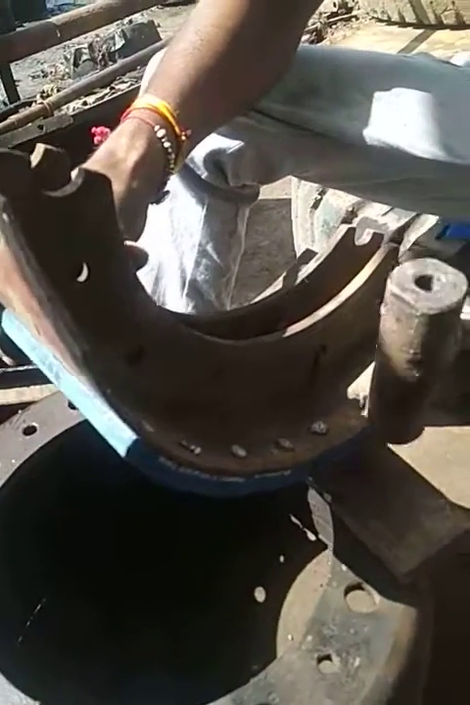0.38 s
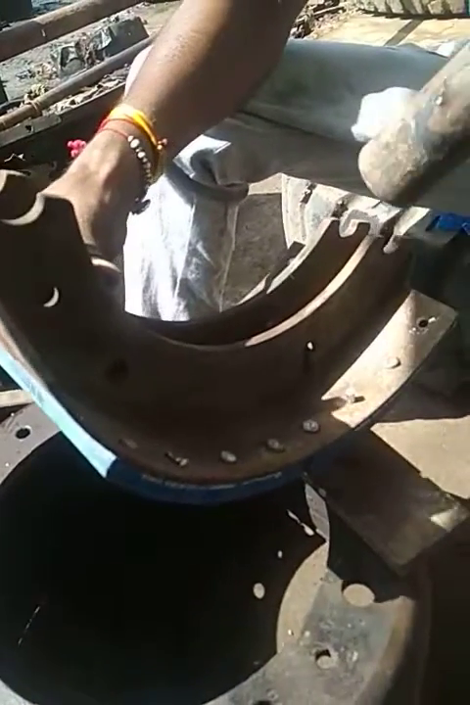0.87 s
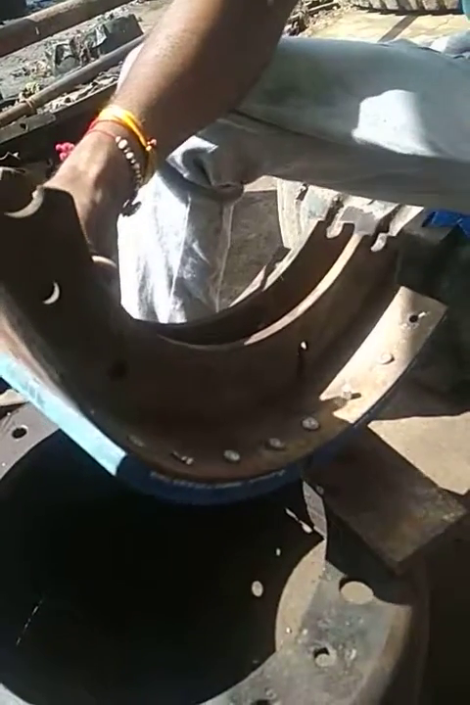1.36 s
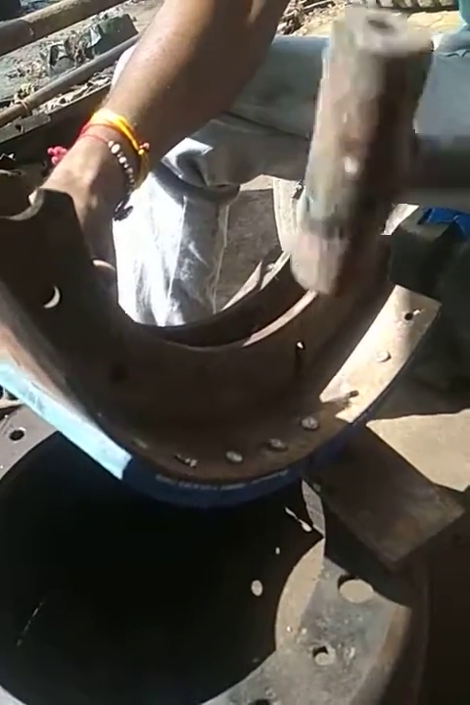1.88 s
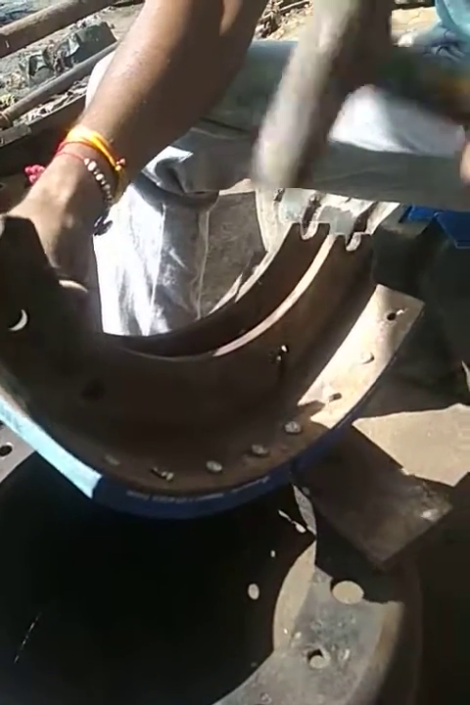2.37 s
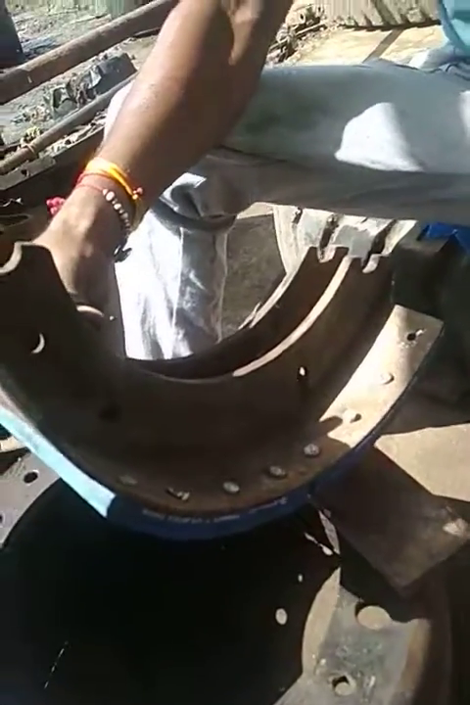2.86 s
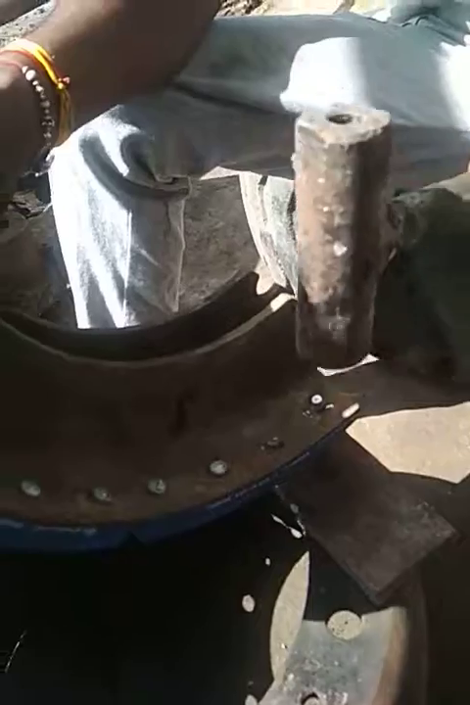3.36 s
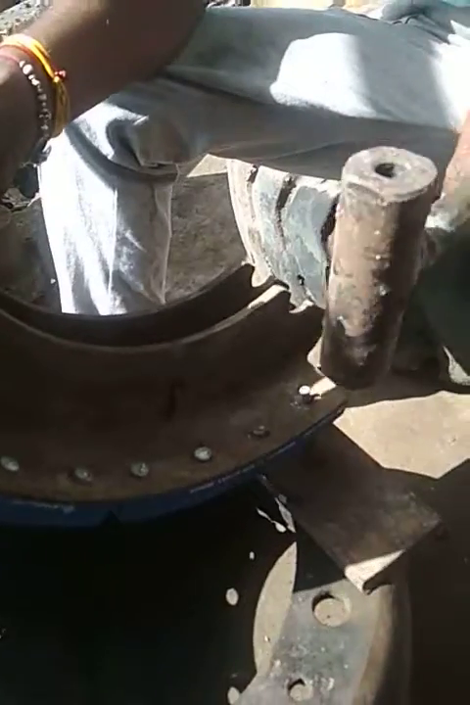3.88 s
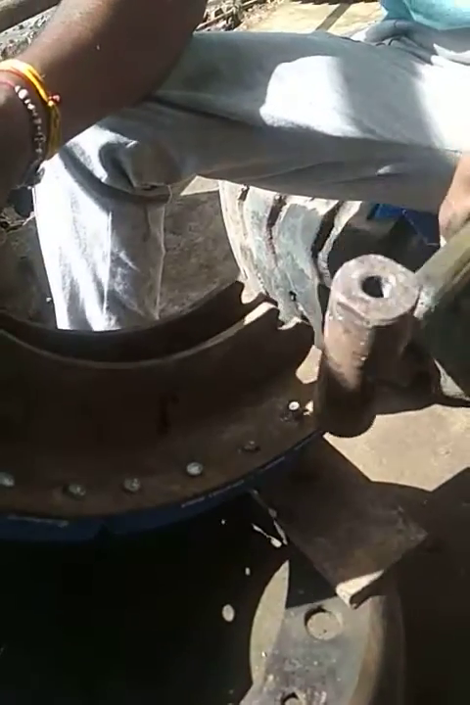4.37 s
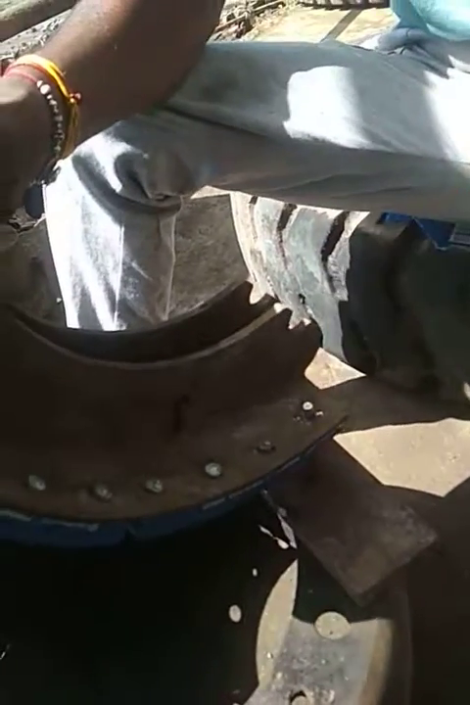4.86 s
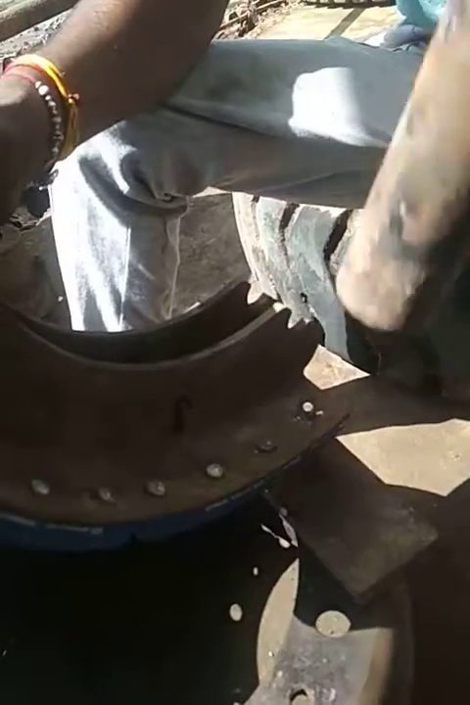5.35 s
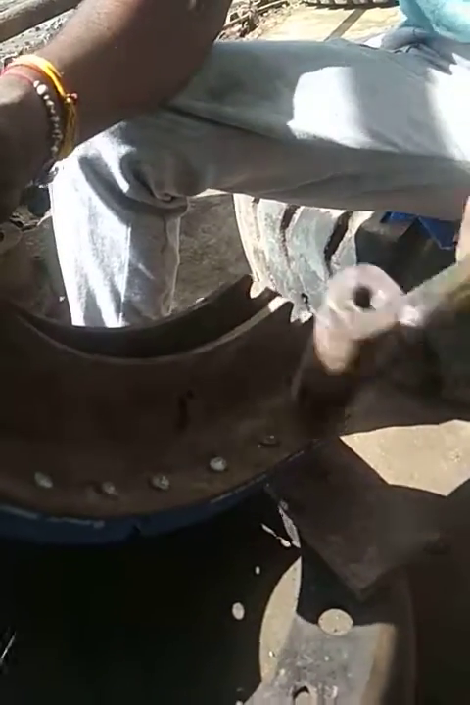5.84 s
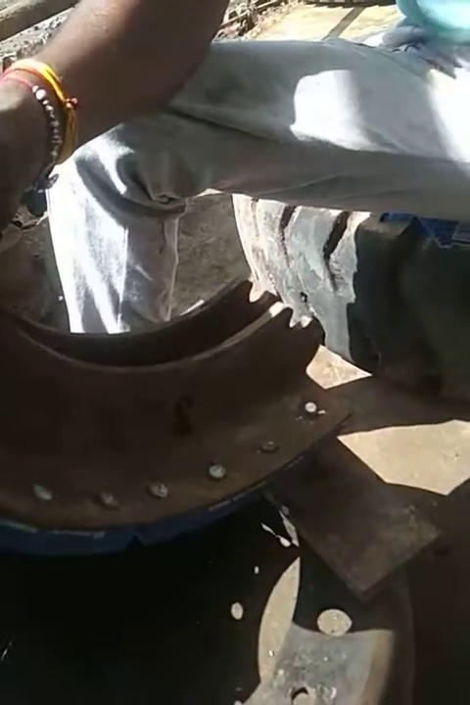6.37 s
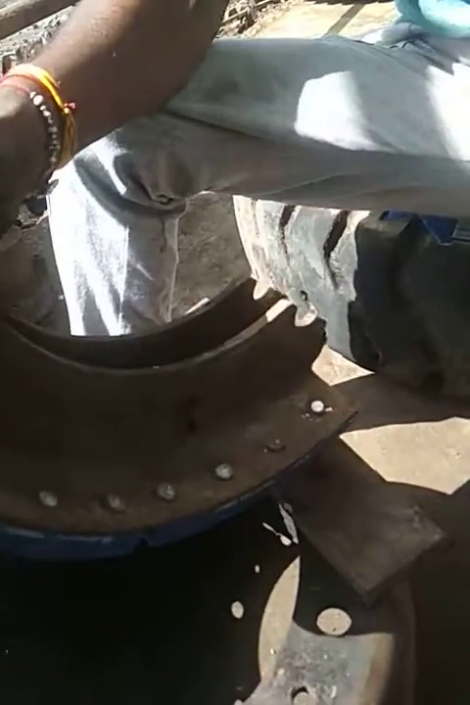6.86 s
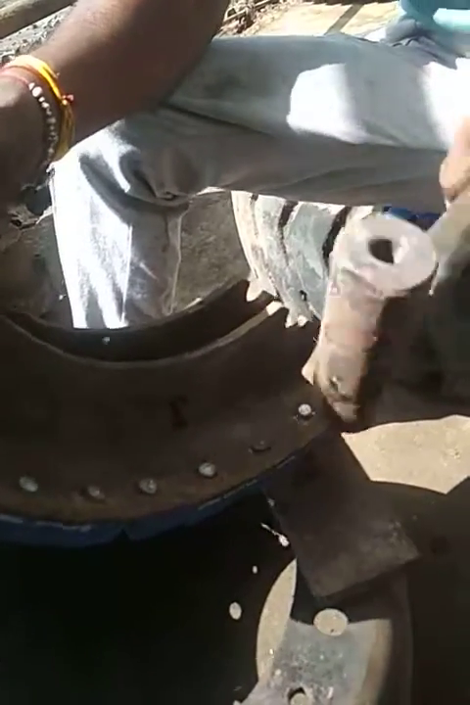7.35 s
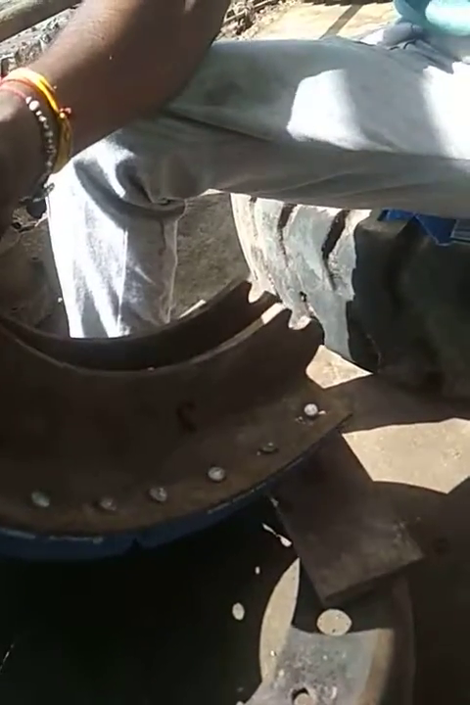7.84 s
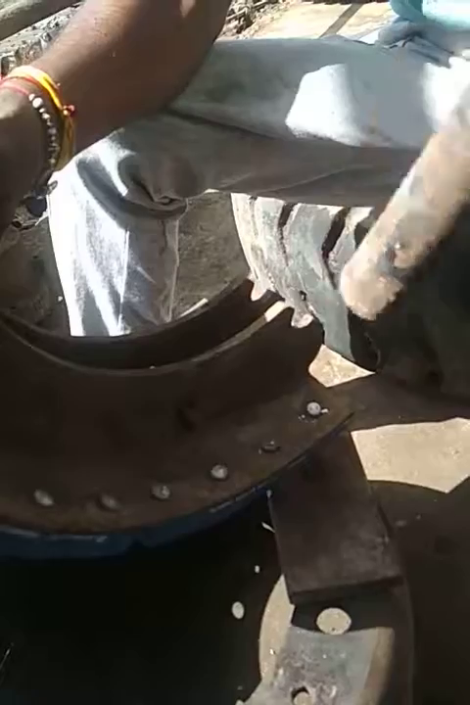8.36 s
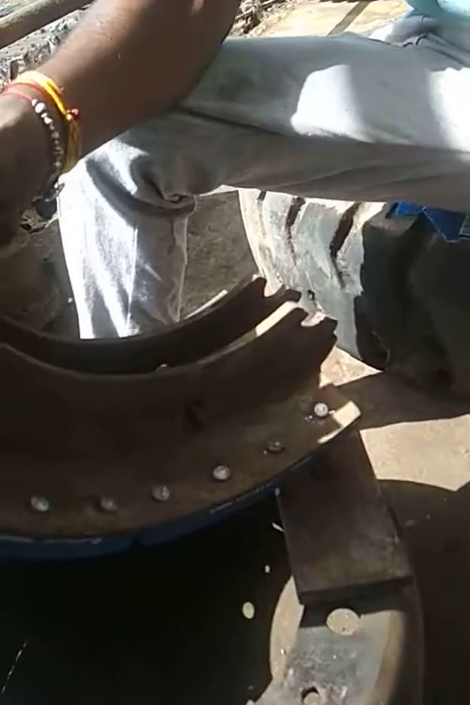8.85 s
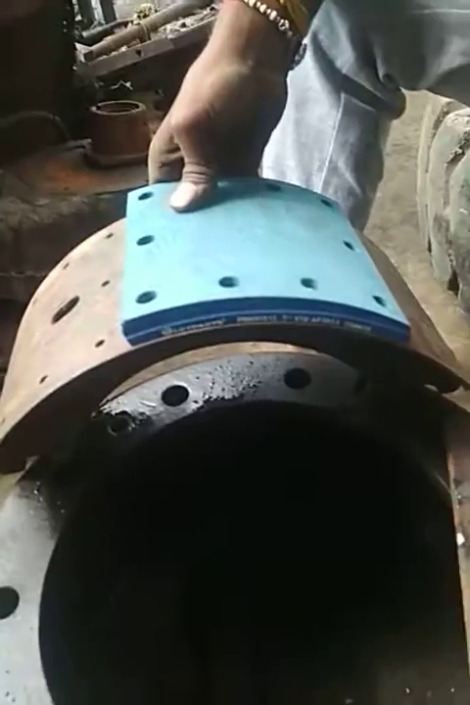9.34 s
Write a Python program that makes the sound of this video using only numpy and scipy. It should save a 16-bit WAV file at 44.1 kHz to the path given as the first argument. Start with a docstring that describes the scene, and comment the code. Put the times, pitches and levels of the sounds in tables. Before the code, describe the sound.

Close hammer blows clank and ring on a steel shoe over an iron drum, while a vehicle passes and a bird chirps faintly.

```python
"""A hammer sets rivets, close to two microphones, on a steel brake shoe that rests on an iron drum in an open workshop.
Blows and bounces are dying modes, noisy clang and crack; chatter repeats the steel part, and the shed echoes.
The ringing breaks off at 2.8 and 8.9 s. Steel drags, knocks, scuffs and hums; treble hiss comes in bursts.
Between the two breaks a vehicle passes: three shaped noises and a wavering exhaust drone.
Farther off a bird gives hoarse, arched sine chirps, above the patchy noise of the yard."""
import sys
import numpy as np
from scipy import signal
from scipy.fft import rfft, irfft
from scipy.io import wavfile
from scipy.ndimage import uniform_filter1d, minimum_filter1d

SR = 44100
rng = np.random.default_rng(int(sys.argv[2]) if len(sys.argv) > 2 else 0)


def amplitude_ratio(level_db):
    """Convert a level in decibels to the matching linear amplitude (field) ratio."""
    exponent = np.asarray(level_db, float) / 20
    return 10 ** exponent


def wav_out(sig):
    """Save sig, one row per channel (or a flat mono array), as 16-bit PCM at SR to the path in sys.argv[1]."""
    wavfile.write(sys.argv[1], SR, np.round(np.clip(np.atleast_2d(sig).T, -1, 1) * 32767).astype(np.int16))


N = 428651

# Hammer blows: (time [s], strength [dB], drum boom [dB], shoe ring [dB], ring length [factor on decays])
BLOWS = [(0.275, -19, -3, -12.5, 0.49), (1.574, -19, 3, -2.5, 0.77), (2.292, -15.5, -1.5, -1, 0.89),
         (3.379, -21, -6, -10, 0.5), (3.438, -23, -6.5, -12, .36), (3.782, -11, -10.5, -10.5, 0.63),
         (4.133, -10.5, -7.5, -10, 0.59), (4.968, -7, -6, -10, 0.73), (5.684, -8, -7.5, -6.5, 0.71),
         (6.394, -11.5, -5, -3.5, 0.81), (7.105, -13, -10.5, -3, 0.96), (7.824, -14, -4.5, -2, 1.0)]
# The shoe lands back on the drum: (time [s], strength [dB], drum boom [dB], shoe ring [dB], crack [dB])
BOUNCES = [(0.299, -28, 1.5, -2.5, -19), (0.332, -41, 2.5, -15.5, -19), (1.7, -42, 13.5, -29, -14.5),
           (3.809, -26.5, -1, -5, -14.5), (4.161, -22.5, -7.5, -18.5, -19), (5.739, -13.5, 1, -8, -24.5),
           (5.77, -15, -38, -9.5, -37.5), (6.455, -19, -4.5, -1.5, -33.5), (6.657, -43, 6.5, -10.5, -28.5),
           (6.761, -43, 3.5, -4.5, 1), (7.174, -12, -12, 2, -27), (7.28, -33, -3.5, -4.5, -13),
           (7.358, -42, 8, -5.5, -27), (7.461, -40, 5, -1.5, -30), (7.884, -14, -18.5, 1, -31.5)]
# Steel is set down and knocks: (time [s], strength [dB], drum boom [dB], ring [Hz], ring level [dB])
KNOCKS = [(8.612, -23, 4, 2250, -27.5), (8.672, -27, -2.5, 2070, -27.5), (8.772, -26, -2.5, 2314, -33),
          (8.808, -35.5, 3.5, 2270, -34.5), (8.854, -41.5, 10, 2260, -55)]
# Modes of the iron drum: (frequency [Hz], level [dB], t60 [s])
DRUM_MODES = [(88.6, -5, 0.38), (111.6, -1.5, .3), (156, 0, 0.2), (222.4, -1.5, 0.18), (266.5, -1, 0.23),
              (339, -7, 0.21)]
# Modes of the steel shoe: (frequency [Hz], level [dB], t60 [s])
SHOE_MODES = [(552.7, -12, 0.52), (783, 1.85, 0.32), (854, -5.5, 0.46), (1045, -0.5, 0.27), (1189, 2, 0.27),
              (1335, -17.5, .22), (1541, -4.5, .2), (1617, -7, .22), (1813, -23, 0.073), (2088, -3.5, 0.24),
              (2216, 2, 0.3), (2650, -11, 0.22), (2673, -15, 0.45), (2995, -10, .35), (3297, -12, 0.34),
              (3840, -28.5, 0.56)]
# Modes of the hammer: (frequency [Hz], level [dB], t60 [s])
HAMMER_MODES = [(5120, -21.5, .2), (5410, -11, 0.96), (6460, -15, 0.23), (7340, -21, 0.23),
                (8600, -12, 0.3), (8900, 2.5, 0.54), (10160, 1.3, 0.57), (10600, -4, 0.68),
                (11250, -6, 0.6), (11200, -7.5, 0.2), (12700, -13, .3), (14800, -11, .4),
                (14600, -12.5, 0.63)]
# Dense crowd of modes: (frequency [Hz], level [dB per Hz])
CLANG = [(40, -37), (90, -11), (176, 4), (620, -12.5), (800, -7.5), (1200, -10), (2200, -19.5),
         (2900, -30.5), (9000, -31), (13300, -35), (16000, -61)]
# Decay of that crowd: (frequency [Hz], t60 [s])
CLANG_T60 = [(60, 0.9), (300, 0.22), (1000, 0.16), (3000, 0.22), (8000, 0.052), (16000, 0.17)]
# Slow modes after a blow: (frequency [Hz])
LASTING_HZ = [2116, 2141, 2562, 5410, 6135, 14050]
# For each of them: (t60 [s], level before the first break [dB], level after it [dB], gain [dB per dB of shoe ring])
LASTING = [(1.0, -12.5, -41, 3), (.42, 2, -30.5, 1.5), (0.73, -30, 3, 6), (1.4, -60, -20, 2.5),
           (0.27, -45.5, -44, -2.1), (.85, -59.5, -16.5, 3.0)]
# Decay of the shed's echo: (frequency [Hz], t60 [s])
SHED_T60 = [(60, 0.51), (500, 0.71), (2000, 0.69), (8000, 0.9), (16000, 0.34)]
# The ringing breaks off, the last time at the very end: (time [s])
BREAKS = [2.776, 8.935, 9.72]
# Likeness of the two microphones: (frequency [Hz], correlation [-1 to 1])
LIKENESS = [(60, 0.96), (240, 0.97), (950, -0.0072), (3770, -0.13), (15000, 0.097)]
# The microphones face different ways: (frequency [Hz], left minus right [dB])
TILT = [(60, -1.5), (150, 1), (380, 1.5), (950, -0.5), (2380, 1), (5980, -3.5), (15000, -8)]
# Steel sliding on iron: (frequency [Hz], level [dB per Hz])
DRAG = [(180, -36), (300, -11.5), (502, -15.5), (1140, 1.5), (1680, -9.5), (2390, -12.5), (3690, -16.5),
        (6900, -21), (14000, -32)]
# Its strokes: (time [s], length [s], level [dB], fall [dB per s])
DRAGS = [(8.774, .158, -38, 33), (9.495, 0.25, -43, 79.5)]
# Faint rub through the shoe's resonances: (frequency [Hz], level [dB per Hz])
SCUFF = [(35, -36), (60, -12), (136, 0.5), (184, -25), (277, -3), (377, -42), (403, -25), (530, -15.5),
         (577, -3), (757, -37), (1080, -11.5), (1330, -12.5), (1830, -37), (2410, -19), (3500, -38.5),
         (4550, -24), (7700, -120)]
# The shoe is shifted by hand: (time [s], length [s], level [dB], fall [dB per s])
SCUFFS = [(8.936, .58, -56.5, 2.5)]
# Treble hiss: (frequency [Hz], level [dB per Hz])
HISS = [(3000, -45), (5500, -14), (7000, -8), (11500, 0), (14500, -5), (16300, -25)]
# Bursts of that hiss: (time [s], length [s], level [dB], fall [dB per s])
PUFFS = [(0.0, .26, -47.5, 97.5), (2.547, .235, -43.5, 21.5), (9.304, .045, -50, 449),
         (9.345, 0.092, -43, 400), (9.328, .38, -69, 9), (9.498, .08, -53.5, 278.5), (9.611, 0.052, -62, 5),
         (9.68, .04, -56.5, 29)]
# Passing vehicle: (time [s], nearness [dB])
PASSING = [(2.79, -52), (2.98, -25), (3.58, -0.5), (4.3, -5.5), (4.91, -4), (5.58, -0.05), (6.3, -4.5),
           (6.88, -12.5), (7.6, -13.5), (8.2, -16), (8.55, -21.5), (8.93, 2)]
# Engine and ground: (frequency [Hz], level [dB per Hz])
RUMBLE = [(15, -30.5), (25, -3), (81, 3.5), (139, 3.5), (258, -6.5), (285, -14), (354, -30.5), (419, -45),
          (451, -70), (590, -59), (990, -120)]
# Tyres and engine body: (frequency [Hz], level [dB per Hz])
ROAR = [(240, -14), (400, -3), (568, -11), (606, -10), (846, -2), (988, -6), (1370, -2.5), (1850, -10),
        (2800, -15.5), (3640, -30), (6160, -120)]
# Tyre hiss: (frequency [Hz], level [dB per Hz])
RUSH = [(1530, -25), (2600, -1), (3500, -7.5), (6470, -6), (8510, -12.5), (12400, -11), (15300, -39),
        (16000, -67)]
# Exhaust drone before its wavering: (time [s], pitch [Hz], level [dB])
DRONE = [(3.3, 120.2, -59.5), (3.48, 136.4, -33.5), (3.72, 160, -38.5), (3.89, 143.6, -36),
         (4.2, 150.7, -31), (4.65, 151.7, -34.5), (4.99, 148.7, -25), (5.5, 135.9, -36.5), (5.77, 156, -34),
         (5.9, 153, -49), (6.0, 155, -34), (6.36, 144.3, -31), (6.9, 134, -43.5)]
# Its partials: (multiple of the drone pitch, level [dB])
ORDERS_DB = [(2 / 3, -13), (1, 0), (4 / 3, -16), (5 / 3, -14), (2, -21), (7 / 3, -19)]
# Distant bird: (time [s], length [s], level [dB], start pitch before the trill [Hz])
CHIRPS = [(1.981, 0.089, -47.5, 2880), (2.73, 0.081, -33, 3373), (3.452, 0.11, -35.5, 3340),
          (7.573, 0.14, -32.5, 3185)]
# Noise of the yard: (frequency [Hz], level [dB per Hz])
YARD = [(15, -24.5), (25, -4), (94, 7), (170, -22), (270, -12), (335, -14), (427, -12), (591, -28.5),
        (962, -21), (1840, -29.5), (7310, -45.5), (13200, -50), (14400, -46), (16000, -48)]

BLOW_RISE_S, BOUNCE_RISE_S, BOUNCE_LENGTH = 0.00045, 0.009, 0.58  # rise time constants; factor on decays
CHATTER_PER_S, CHATTER_S, CHATTER_DB = 300, 0.051, -4.5  # tiny landings just after a hit
DETUNE = 0.0015  # relative spread: modes shift a little from hit to hit
HAMMER_DB, HAMMER_PER_DB = -27.5, 0.7  # the hammer sings with the shoe: dB, dB per dB of shoe ring
# The less the shoe rings, the more it knocks near 1.5 kHz: dB, dB per dB of shoe ring
DULL_DB, DULL_PER_DB = 1.5, 0.5442
CRACK_DB, CRACK_PER_DB = -18.5, -0.5  # a blow that goes into the drum cracks less: dB, dB per dB of boom
KNOCK_SHOE_DB, KNOCK_CRACK_DB, KNOCK_LENGTH = -23, -27.5, 0.64  # dB, dB, factor on decays
KNOCK_T60, KNOCK_LOW_HZ, KNOCK_LOW_T60 = 0.26, 950, 0.16  # s, Hz, s
KNOCK_LOW_DB = 2.6  # lower mode over the knock's ring
TAIL_DB, TAIL_POWER = -10, 2  # a long ring feeds the echo more: dB, exponent on the ring length factor
HUM_S, HUM_HZ, HUM_DB, HUM_LENGTH_S, HUM_FADE_DB = 8.94, 568, -53.5, 0.49, -24
RUMBLE_DB, ROAR_DB, RUSH_DB = -34.5, -34.5, -43.5
RUMBLE_SHARE, RUSH_SHARE = 0.55, 0.82  # dB per dB of nearness
RUMBLE_FADE_DB_PER_S = 1.5  # the bass lingers behind the vehicle
CHIRP_PULL, CHIRP_END = 1.5, 0.84  # pull of the arch and last pitch, as multiples of the start
YARD_DB = -62


def evened(x):
    """Scales to rms 1."""
    return x / np.sqrt(np.mean(x ** 2) + 1e-20)


def read(points, hz):
    """Reads a spectrum table on a log-frequency axis."""
    f, value = np.transpose(points)
    return np.interp(np.log(hz + 1), np.log(f + 1), value)


def curve(rows, t):
    """Reads the columns of a time table."""
    s, *columns = np.transpose(rows)
    return [np.interp(t, s, c) for c in columns]


def add(mix, s, sound):
    """Mixes a sound in at s; it ends at the next break."""
    stop = min(k for k in BREAKS if k > s)
    part = mix[:, round(s * SR):round(stop * SR)][:, :sound.shape[1]]
    part += sound[:, :part.shape[1]]


def noise(field_db, count, size, patchy_db=1.5):
    """Two-microphone noise whose dB level is field_db(Hz, s), with drifting patches."""
    hz = np.fft.rfftfreq(size, 1 / SR)[:, None]
    t = np.arange(count * 4 // size + 5) * size / 4 / SR
    a, b, c, d, patches = rng.standard_normal((len(t), len(hz), 5)).T
    patches = uniform_filter1d(patches, size=8, axis=0)
    patches = evened(uniform_filter1d(patches, size=8, axis=1))
    same = read(LIKENESS, hz)
    left = a + 1j * b
    right = same * left + np.sqrt(1 - same ** 2) * (c + 1j * d)
    z = np.array([left, right]) * amplitude_ratio(field_db(hz, t) + patchy_db * patches)
    return signal.istft(z, nperseg=size, noverlap=size * 3 // 4)[1][:, :count]


def steady(spectrum, size, patchy_db):
    """Noise of one spectrum for the whole length, at rms 1."""
    return evened(noise(lambda hz, s: read(spectrum, hz) + 0 * s, count=N, size=size, patchy_db=patchy_db))


def ring(modes, t, longer, spread_db=2.0):
    """Dying sines that beat; each hit draws the mode levels anew, each microphone its own phase."""
    hz, db, t60 = np.transpose(modes)[:, :, None]
    hz = hz * (1 + DETUNE * rng.standard_normal(hz.shape))
    same = np.clip(read(LIKENESS, hz), 0, 1)
    luck = rng.standard_normal(hz.shape)
    phase = rng.uniform(0, 2 * np.pi, hz.shape)
    beat_turns = rng.uniform(7, 30, hz.shape) * t + rng.random(hz.shape)
    beat = 1 + 0.35 * np.sin(2 * np.pi * beat_turns)
    level_db = db + spread_db * luck - 60 * t / (t60 * longer)
    out = []
    for _ in "LR":
        turn = phase + (1 - same) * rng.uniform(-1.7, 1.7, hz.shape)
        out.append((beat * amplitude_ratio(level_db) * np.sin(2 * np.pi * hz * t + turn)).sum(0))
    return np.array(out)


def blow(db, boom_db, shoe_db, crack_db, longer, rise_s, chatter_db):
    """A crack, a dense clang, and the clear modes of drum, shoe and hammer; chatter strikes the steel again."""
    t = np.arange(SR * 5 // 8) / SR
    upper = [row for row in SHOE_MODES if row[0] > 1900]
    lower = [row for row in SHOE_MODES if row[0] <= 1900]
    drum = amplitude_ratio(boom_db - 2.0) * ring(DRUM_MODES, t, longer)
    drum = drum * (1 - np.exp(-t / 0.00087))  # the heavy drum starts late
    shoe = amplitude_ratio(-11.5) * ring(lower, t, longer) + amplitude_ratio(shoe_db - 8.0) * ring(upper, t, longer)
    hammer = amplitude_ratio(HAMMER_DB + HAMMER_PER_DB * shoe_db) * ring(HAMMER_MODES, t, longer)

    dull_db = DULL_DB - DULL_PER_DB * shoe_db
    colour = [(150, boom_db), (1000, 1.2), (1500, dull_db), (2300, shoe_db + 15.0), (9000, crack_db + 22)]

    def clang_db(hz, s):
        return read(CLANG, hz) + read(colour, hz) - 60 * s / (longer * read(CLANG_T60, hz))

    clang = noise(clang_db, count=len(t), size=512, patchy_db=0)
    crack = amplitude_ratio(crack_db + 7.0) * rng.standard_normal((2, len(t))) * np.exp(-t / 0.0025)
    steel = shoe + amplitude_ratio(-5.5) * clang

    landed = rng.random(len(t)) < CHATTER_PER_S / SR
    taps = rng.standard_normal(len(t)) * landed * np.exp(-(t / CHATTER_S) ** 2)
    taps = taps / np.sqrt(CHATTER_PER_S * CHATTER_S)
    chatter = signal.fftconvolve(steel, taps[None], axes=1)[:, :len(t)]
    hit = drum + steel + amplitude_ratio(chatter_db) * chatter + hammer + crack
    return amplitude_ratio(db + 9.0) * hit * (1 - np.exp(-t / rise_s))


def shed(x):
    """Sparse reflections of random sign, each band dying at its own speed."""
    taps = np.zeros((2, SR))
    at = np.arange(500, SR - 20, 20) + rng.integers(0, 20, (2, (SR - 501) // 20))
    np.put_along_axis(taps, at, rng.choice([-1., 1.], at.shape), 1)
    hz, t, z = signal.stft(taps, SR, nperseg=256)
    decay = amplitude_ratio(-60 * t / read(SHED_T60, hz)[:, None])
    tail = signal.istft(z * decay, SR, nperseg=256)[1]
    return signal.fftconvolve(x, tail / np.linalg.norm(tail[0]), axes=1)[:, :N]


def struck():
    """Lists blows, bounces and knocks as (time [s], ring length factor, sound)."""
    hits = []
    for s, db, boom, shoe, longer in BLOWS:
        crack = CRACK_DB + CRACK_PER_DB * boom
        hits.append((s, longer, blow(db, boom, shoe, crack, longer, BLOW_RISE_S, CHATTER_DB)))
    for s, *levels in BOUNCES:
        hits.append((s, BOUNCE_LENGTH, blow(*levels, BOUNCE_LENGTH, BOUNCE_RISE_S, CHATTER_DB)))
    for s, db, boom, _, _ in KNOCKS:
        sound = blow(db, boom, KNOCK_SHOE_DB, KNOCK_CRACK_DB, KNOCK_LENGTH, BLOW_RISE_S, -np.inf)  # no chatter
        hits.append((s, KNOCK_LENGTH, sound))
    return hits


def hammering():
    """All hits with the shed's echo, both stopped at each break."""
    hits = struck()
    out = np.zeros((2, N))
    for start, stop in zip([0, *BREAKS], BREAKS):
        direct, fed = np.zeros((2, 2, N))
        for s, longer, sound in hits:
            if start <= s < stop:
                add(direct, s - 0.001, sound)
                add(fed, s - 0.001, amplitude_ratio(TAIL_DB) * longer ** TAIL_POWER * sound)
        add(out, start, (direct + shed(fed))[:, round(start * SR):])
    return out


def lasting_modes():
    """Slow modes that sing on after each blow, and two clear modes for each knock."""
    out, t = np.zeros((2, N)), np.arange(SR) / SR
    for s, db, _, shoe, _ in BLOWS:
        modes = []
        for hz, (t60, early, late, gain) in zip(LASTING_HZ, LASTING):
            base_db = early if s < BREAKS[0] else late
            modes.append((hz, db + base_db + gain * shoe, t60))
        add(out, s, ring(modes, t, longer=1, spread_db=0))
    for s, _, _, hz, db in KNOCKS:
        modes = [(hz, db, KNOCK_T60), (KNOCK_LOW_HZ, db + KNOCK_LOW_DB, KNOCK_LOW_T60)]
        add(out, s, ring(modes, t, longer=1, spread_db=0))
    return out


def humming():
    """One mode of a steel part that fades ever faster."""
    out = np.zeros((2, N))
    u = np.arange(0, 1, 1 / (SR * HUM_LENGTH_S))  # progress from 0 to 1
    level = np.sqrt(2) * amplitude_ratio(HUM_DB + HUM_FADE_DB * u ** 1.84)
    tone = level * np.sin(2 * np.pi * HUM_HZ * HUM_LENGTH_S * u)
    add(out, HUM_S, np.array([tone, tone]) * signal.windows.tukey(len(u), 0.05))
    return out


def bursts(spectrum, events, grain_db, rise_s, size=256):
    """Grainy noise in bursts: a short rise, a steady fall in dB, a quick stop."""
    air = steady(spectrum, size, grain_db)
    t = np.arange(N) / SR
    power = np.zeros(N)
    for s, length, db, fall in events:
        gate = np.clip(np.minimum((t - s) / rise_s, (s + length - t) / 0.004), 0, 1)
        power += (amplitude_ratio(db - fall * np.maximum(t - s, 0)) * gate) ** 2
    return air * np.sqrt(power)


def dragging():
    """Steel slides on iron: friction as shaped noise."""
    return bursts(DRAG, DRAGS, grain_db=1.6, rise_s=0.047)


def scuffing():
    """The shoe is rubbed as it is shifted: patchy noise through its resonances."""
    return bursts(SCUFF, SCUFFS, grain_db=4.0, rise_s=0.005, size=1024)


def hissing():
    """Treble noise in bursts."""
    return bursts(HISS, PUFFS, grain_db=0.94, rise_s=0.003)


def road():
    """Rumble, roar and rush follow the vehicle's nearness by their own amounts, between the two breaks."""
    t = np.arange(N) / SR
    near_db = curve(PASSING, t)[0]
    fall = RUMBLE_FADE_DB_PER_S * t
    lingering_db = np.maximum.accumulate(RUMBLE_SHARE * near_db + fall) - fall
    levels = [RUMBLE_DB + lingering_db, ROAR_DB + near_db, RUSH_DB + RUSH_SHARE * near_db]
    sound = sum(amplitude_ratio(db) * steady(spectrum, 1024, 1.6) for spectrum, db in zip([RUMBLE, ROAR, RUSH], levels))
    return sound * (t > BREAKS[0]) * (t < BREAKS[1])


def exhaust():
    """Low orders of the vehicle's exhaust as sines, wavering together in pitch and level."""
    t = np.arange(N) / SR
    hz, db = curve(DRONE, t)
    wobble = evened(uniform_filter1d(rng.standard_normal(N), size=3000))
    turns = np.cumsum(hz * (1 + 0.00328 * wobble)) / SR
    drone = sum(amplitude_ratio(d) * np.sin(2 * np.pi * (k * turns + rng.random())) for k, d in ORDERS_DB)
    fade = np.clip(np.minimum(t - DRONE[0][0], DRONE[-1][0] - t) / 0.24, 0, 1)
    return np.sqrt(2) * amplitude_ratio(db + 1.2 * wobble) * fade * drone


def bird():
    """Hoarse arched chirps: a sine split into sidebands by a fast trill, blurred by distance."""
    out = np.zeros((2, N))
    for s, length, db, start_hz in CHIRPS:
        u = np.arange(0, 1, 1 / (SR * length))  # progress from 0 to 1
        hz = start_hz * ((1 - u) ** 2 + 2 * u * (1 - u) * CHIRP_PULL + u ** 2 * CHIRP_END)
        jitter = evened(uniform_filter1d(rng.standard_normal(len(u)), size=80))
        hz = hz + 500 * np.sin(2 * np.pi * 550 * u * length) + 120 * jitter
        chirp = amplitude_ratio(db) * np.sin(2 * np.pi * np.cumsum(hz) / SR) * np.sin(np.pi * u)
        add(out, s, np.array([chirp, np.roll(chirp, 7)]))  # right microphone 7 samples later
    echo = amplitude_ratio(-9) * shed(out)
    silent_half_second = abs(np.arange(N) / SR - BREAKS[0] - 0.25) <= 0.25  # no echo just after the first break
    return out + echo * ~silent_half_second


def yard():
    """Steady, patchy background noise of the open yard."""
    return amplitude_ratio(YARD_DB) * steady(YARD, 2048, 3.0)


def scene():
    """Everything at the two microphones, from the near work to the far yard."""
    work = hammering() + lasting_modes() + humming() + dragging() + scuffing()
    return work + hissing() + road() + exhaust() + bird() + yard()


def band_limit(x):
    """A steep low-pass at the top of the band."""
    return signal.sosfilt(signal.butter(12, 16800, fs=SR, output="sos"), x)


def record(dry):
    """The microphones drop deepest bass and highest treble; a look-ahead limiter flattens loud starts."""
    dry = signal.sosfilt(signal.butter(2, 55, "high", fs=SR, output="sos"), dry)
    dry = signal.sosfilt(signal.butter(10, 16300, fs=SR, output="sos"), dry)
    tilt_db = read(TILT, np.fft.rfftfreq(N, 1 / SR)) / 2
    dry = irfft(rfft(dry) * amplitude_ratio(np.array([tilt_db, -tilt_db])), N)

    peak_db = 20 * np.log10(abs(dry).max(0) + 1e-9)
    fall = np.arange(N) * 158.0 / SR  # recovery at 158 dB per s
    held_db = np.maximum.accumulate(peak_db + fall) - fall
    over_db = np.maximum(held_db + 6.5, 0)  # threshold -6.5 dB
    over_db = -minimum_filter1d(-over_db, size=44)  # looks half a millisecond ahead
    over_db = uniform_filter1d(over_db, size=44)
    limited = dry / amplitude_ratio(0.68 * over_db)
    return band_limit(limited)


dry = scene()
out = record(dry)
wav_out(out)
```